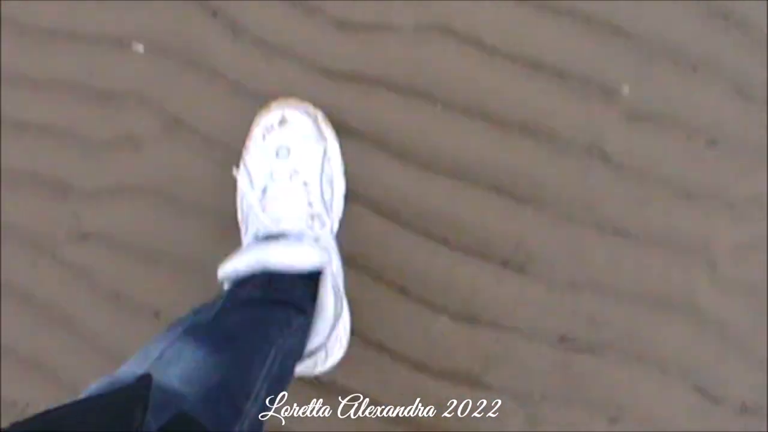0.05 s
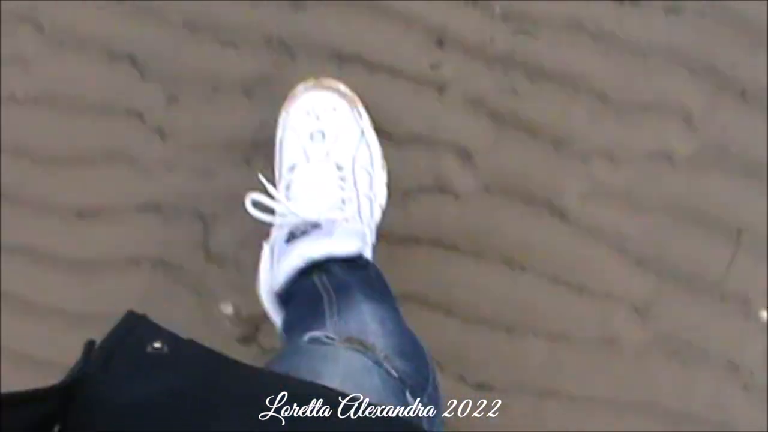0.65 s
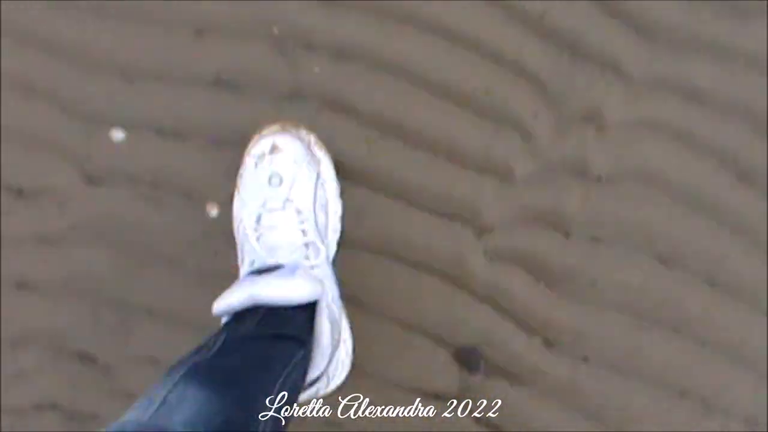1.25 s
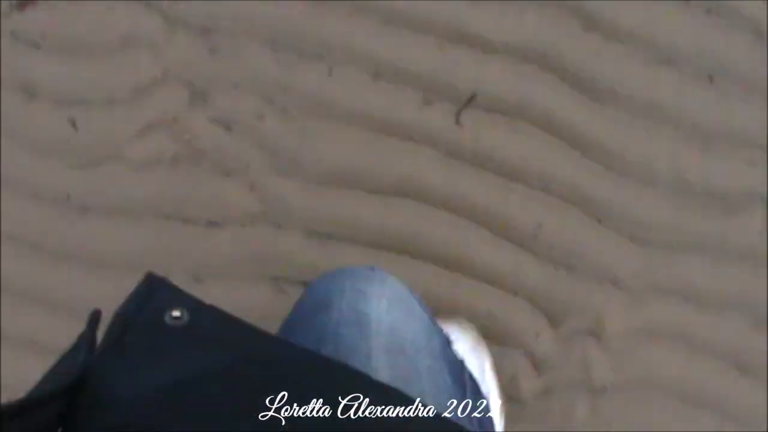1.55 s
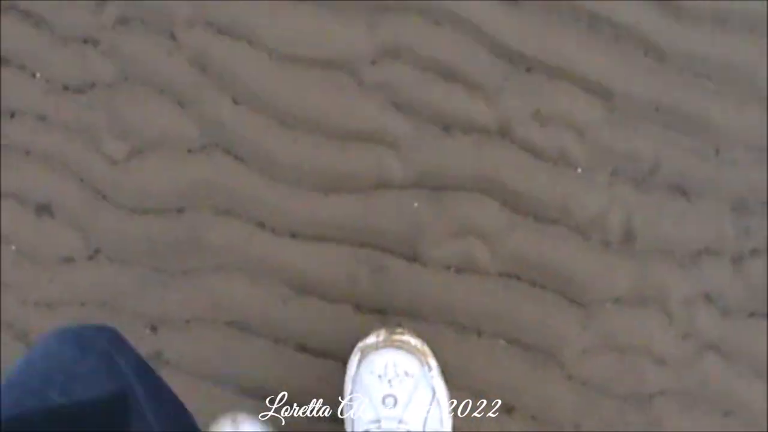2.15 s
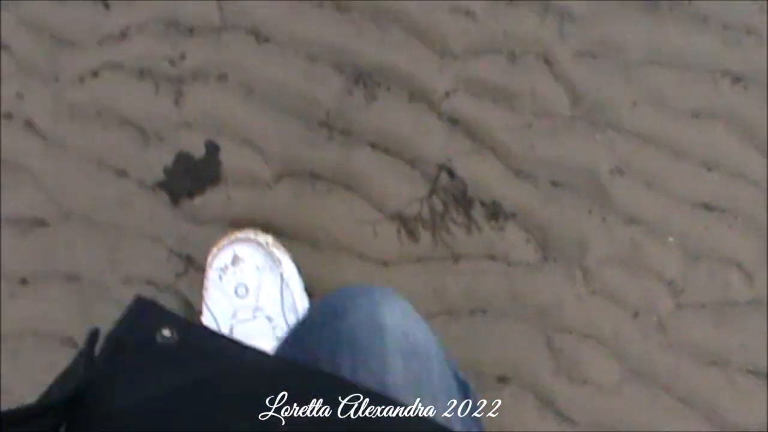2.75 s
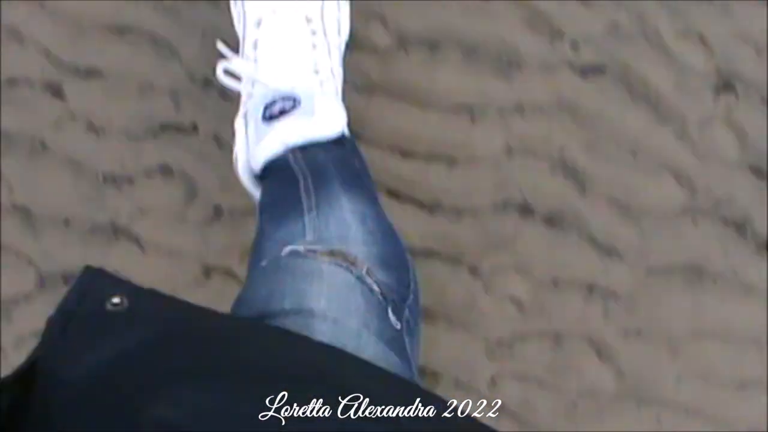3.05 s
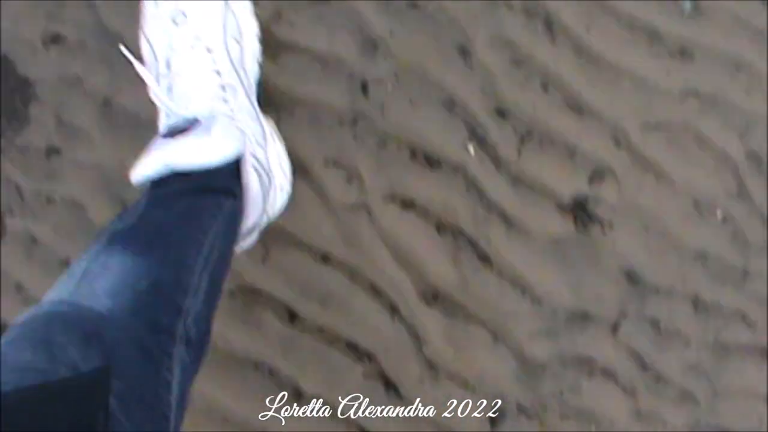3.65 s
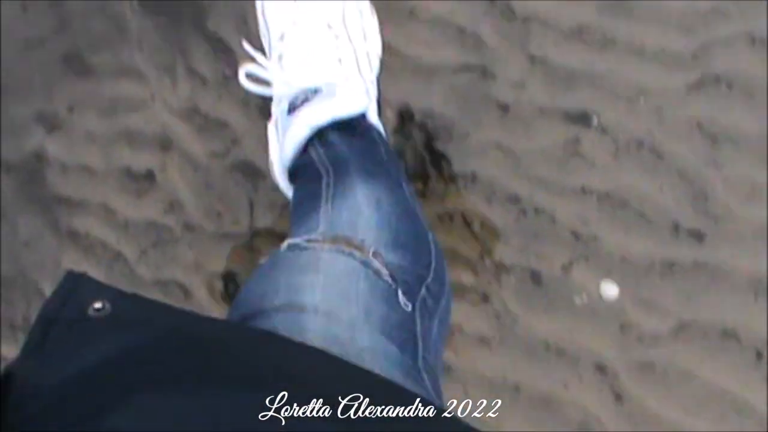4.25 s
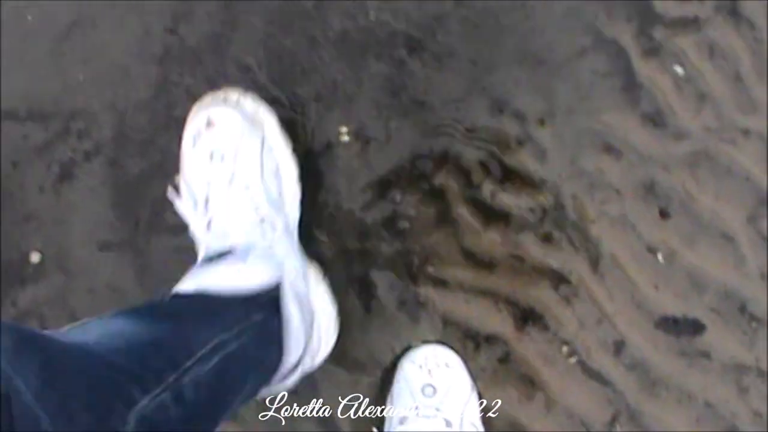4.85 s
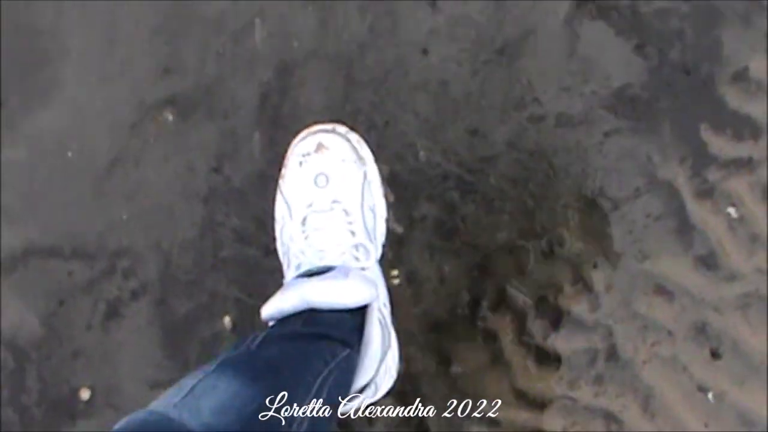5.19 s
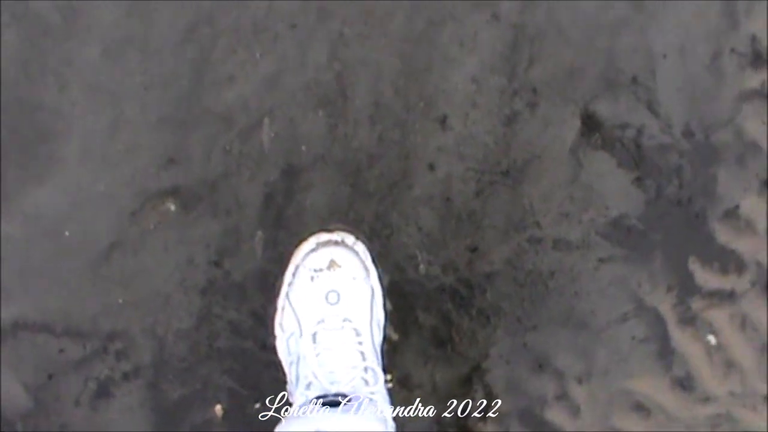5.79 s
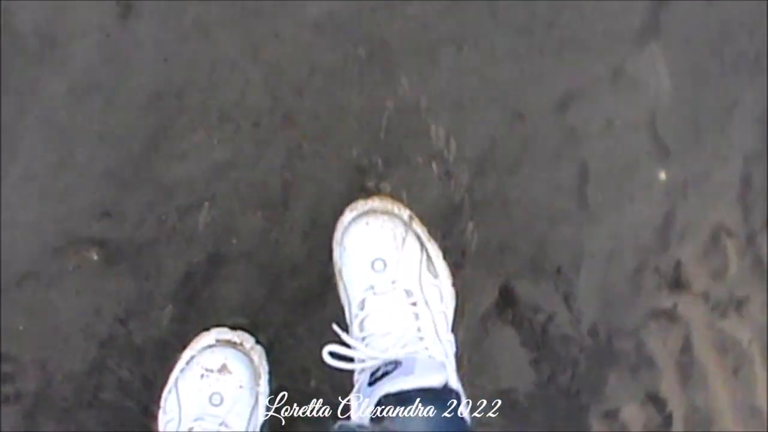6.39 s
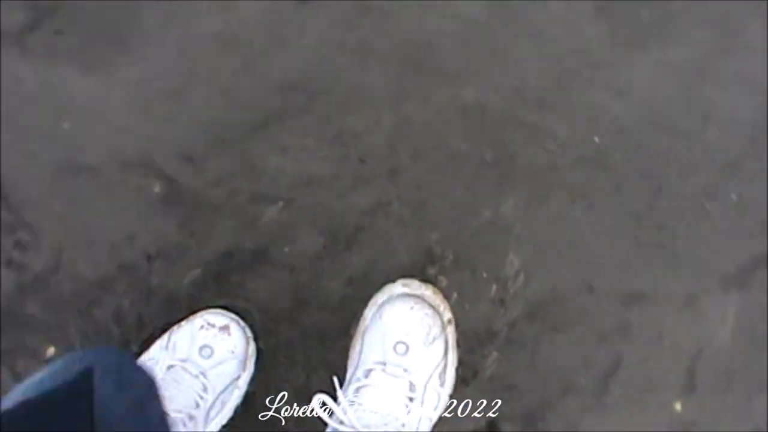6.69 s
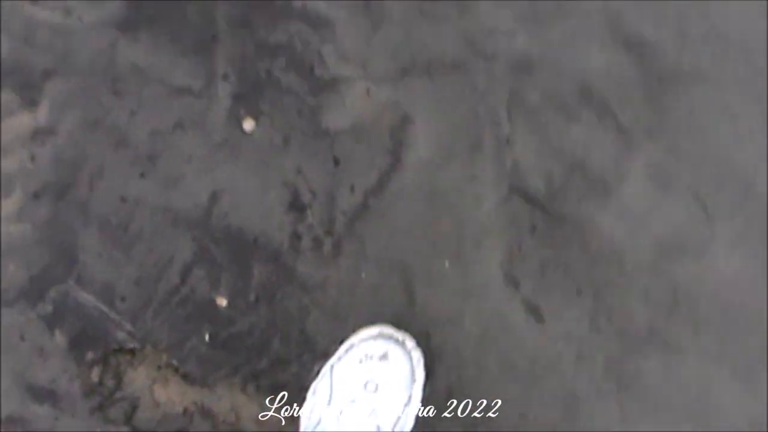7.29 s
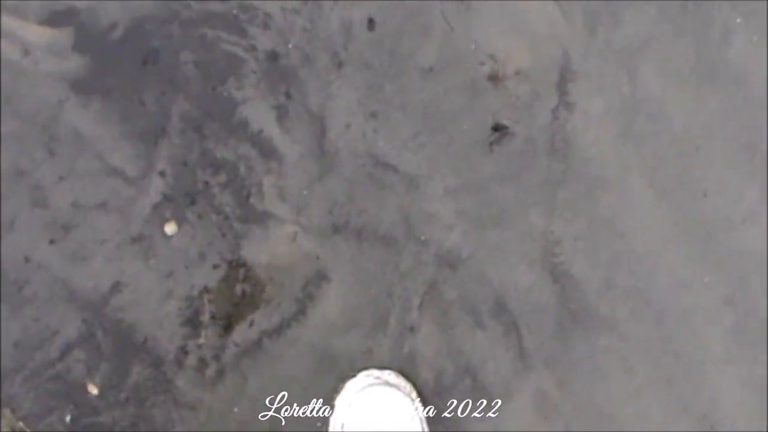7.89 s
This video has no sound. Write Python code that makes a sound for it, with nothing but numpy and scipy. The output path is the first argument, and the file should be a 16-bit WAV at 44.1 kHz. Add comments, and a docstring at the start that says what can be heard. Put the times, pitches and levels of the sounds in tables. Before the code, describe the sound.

Soft footsteps squelch over wet sand and mud, with jeans swishing and wind buffeting the microphone.

```python
"""A windy walk over wet sand

Someone carries a camera over rippled wet sand onto mud. Jeans and soles swish with each stride,
water squelches out under the shoes, and small bubbles ring as they pop. Gusts of swirling air
buffet the microphone openings. Towards the end a far roar, probably surf, swells and is
mirrored by the flat wet ground."""
import sys
import numpy as np
from scipy import signal
from scipy.fft import rfft, irfft, next_fast_len
from scipy.io import wavfile
from scipy.ndimage import uniform_filter1d, minimum_filter1d, map_coordinates

SR = 44100
rng = np.random.default_rng(int(sys.argv[2]) if len(sys.argv) > 2 else 0)


def store_wav(level_fs):
    """Save 16-bit WAV to argv[1]."""
    pcm = np.round(np.clip(np.atleast_2d(level_fs), -1, 1) * 32767)
    wavfile.write(sys.argv[1], SR, pcm.T.astype(np.int16))


N = 358533

# Levels in the tables are relative: the functions set the final loudness.
# Footfalls. Each row: landing time and heel-to-toe roll in seconds, cloth and scuff levels in dB.
FOOTFALLS = [(0.0, 0.16, -41, -44.5), (0.634, 0.11, -41.5, -41), (1.05, .25, -45, -49),
             (1.86, 0.17, -45, -52.5), (2.43, 0.21, -46.5, -47.5), (3.119, 0.21, -42.5, -46.5),
             (3.71, 0.2, -41, -47.5), (4.24, 0.13, -39, -44), (4.951, 0.18, -50, -52),
             (6.19, 0.069, -49.5, -49.5), (6.572, 0.037, -47, -46.5), (7.25, 0.14, -48.5, -50)]
# Denim brushing denim as a leg swings. Each row: peak time in seconds, level in dB, length in seconds.
LEG_SWISHES = [(0.08, -37, 0.018), (0.183, -39, 0.037), (0.304, -39, 0.051), (0.528, -43, 0.11),
               (0.659, -32.5, 0.031), (0.805, -40.5, 0.067), (1.209, -36, 0.022), (1.31, -44, .025),
               (1.4, -48, 0.015), (1.504, -40.5, 0.039), (1.613, -48, 0.015), (1.726, -46.5, 0.026),
               (1.782, -43.5, 0.025), (1.876, -36.5, 0.053), (2.06, -42, 0.032), (2.22, -43.5, 0.12),
               (2.445, -40, 0.035), (2.778, -48, 0.043), (3.01, -47.5, 0.053), (3.145, -37.5, 0.036),
               (3.55, -44.5, 0.11), (3.705, -35.5, 0.023), (3.804, -39.5, .05), (4.003, -44, 0.06),
               (4.3, -34, 0.055), (7.058, -39.5, 0.024), (7.3, -42, 0.03), (7.84, -46.5, 0.036)]
# Clothes and soles never quite rest. Each row: time in seconds, cloth and scuff levels in dB.
RESTING_RUSTLE = [(0, -52.5, -55), (1.1, -45, -48), (1.65, -54, -57), (2.3, -48.5, -51),
                  (2.9, -55.5, -55.5), (4.1, -47, -50), (4.6, -53, -53), (5.55, -59, -60.5),
                  (6.4, -53, -55), (7.15, -47, -52), (7.55, -52, -47), (8.13, -53, -50)]
# Water pressed from under a sole. Each row: middle time and half length in seconds,
# pitch of the large bubbles in Hz, then levels of the large, medium and fine bubbles in dB.
SQUEEZES = [(0.042, 0.03, 1390, -59, -40, -55), (0.091, 0.0081, 1310, -38, -37, -37),
            (.745, 0.021, 1280, -39.5, -55, -55), (1.209, 0.0097, 2400, -47, -42, -48),
            (1.242, .009, 2900, -43, -42, -50), (1.334, 0.017, 1320, -41.5, -41.5, -50),
            (1.935, .03, 1440, -42, -47, -58), (3.747, .003, 2400, -50, -32.5, -42),
            (3.826, 0.018, 1500, -37, -40.5, -50), (3.884, 0.034, 2590, -40, -38, -52),
            (4.307, 0.0062, 1490, -36, -36, -24), (4.347, 0.0092, 1780, -25, -32, -28.5),
            (4.38, .012, 2400, -42, -52, -54), (4.43, .01, 1390, -41.5, -42.5, -40),
            (5.036, 0.0066, 2190, -43, -41, -36), (5.05, .0028, 1680, -26, -23, -18.5),
            (5.077, .007, 1650, -37, -40, -38), (6.219, 0.0058, 1880, -47, -43, -44),
            (6.247, 0.0062, 1720, -45, -39, -40.5), (7.886, 0.0063, 1700, -44, -36.5, -33.5)]
# Single bubbles bursting. Each row: time in seconds, ring level in dB, pitch in Hz, spray level in dB.
BUBBLE_POPS = [(1.0425, -19, 12300, -47), (1.605, -20, 10200, -46), (3.6903, -20, 10500, -31),
               (3.883, -13, 2500, -23), (3.8993, -19, 3280, -30), (3.9188, -17, 3620, -28),
               (3.9453, -30, 3000, -32), (3.9746, -15, 9470, -25), (4.079, -10, 8500, -22.5),
               (4.2972, -20.5, 1480, -20), (4.3222, -18, 3400, -31), (4.3345, -13, 8060, -15),
               (4.343, -17, 3040, -16.5), (4.392, -18, 2440, -44), (4.4301, -33, 3200, -28.5),
               (4.47, -30, 2330, -34), (4.605, -31, 3100, -53), (5.023, -33, 9000, -34),
               (5.0444, -11, 9000, -17.5), (5.0475, -14, 2160, -33), (5.051, -8, 4430, -26),
               (5.0517, -14.5, 1210, -36), (5.0617, -14, 5900, -30), (5.066, -18, 1770, -29),
               (5.0727, -14.5, 3870, -36), (5.0825, -16, 1510, -24.5), (5.102, -23, 1630, -44),
               (5.2775, -34, 1810, -46), (5.885, -29.5, 3230, -39), (5.902, -24, 990, -36),
               (5.9126, -35, 2880, -37), (5.939, -25.5, 7850, -41), (6.0827, -22, 11600, -38),
               (6.2495, -27, 3800, -28.5), (6.276, -25.5, 3900, -37), (6.768, -24.5, 4940, -46),
               (6.918, -20, 12400, -43)]
# The wind's slow course. Each row: time in seconds, then deep push, buffet and flutter levels in dB.
WIND_LEVELS = [(0, -33, -25, -37), (0.5, -35, -34.5, -44), (0.85, -27.5, -21, -33), (1.25, -34, -24, -33.5),
               (1.65, -38, -36.5, -50), (1.95, -36, -23.5, -30.5), (2.3, -35, -23.5, -34),
               (2.58, -34, -21.5, -22.5), (2.78, -33.5, -25, -28.5), (3.3, -33.5, -22, -26),
               (3.95, -33, -20, -29.5), (4.7, -41, -35.5, -45.5), (5.48, -46, -41, -55),
               (5.85, -40, -31, -48), (6.2, -39.5, -43, -64), (7.17, -53.5, -57, -54),
               (7.3, -33, -30.5, -39), (8.13, -26, -19.5, -40.5)]
# Gusts and lulls. Each row: peak time in seconds, buffet and flutter changes in dB, half length in seconds.
GUSTS_AND_LULLS = [(0.157, 13, 10, 0.039), (.52, -5, 1, .04), (0.594, 7.5, 8, 0.014),
                   (1.677, -1.5, -7, .025), (2.115, 2, 1.5, 0.032), (2.259, -6, -6, 0.056),
                   (2.48, 9, 5.5, 0.059), (2.62, -1, 2.5, .06), (3.526, -5, -5, 0.046),
                   (3.733, 5, -0.5, 0.08), (4.302, 4, 2.5, .03), (4.386, -11, -3.5, 0.046),
                   (5.002, 7.5, -2, .03), (5.725, 9.5, 13, 0.068), (5.964, 6, 7, 0.056),
                   (6.494, 11, 1, 0.13), (7.477, 2.5, 1.5, 0.052), (7.646, -10, -2, 0.08),
                   (7.796, 6.5, 12, 0.13)]
# Eddies, small swirls of air that snap. Each row: time in seconds, level in dB, pitch in Hz.
EDDY_SNAPS = [(.588, -17, 345), (.815, -19, 834), (1.392, -18.5, 447), (1.713, -18.5, 298),
              (2.546, -10.5, 800), (2.56, -14, 1330), (2.608, -13, 1570), (2.628, -17, 1500),
              (2.646, -15, 1470), (2.678, -18, 1480), (2.754, -17.5, 850), (2.8708, -14, 1260),
              (3.083, -19, 905), (3.183, -12.5, 950), (3.259, -20, 750), (3.369, -19, 880),
              (3.414, -22, 750), (4.032, -17.5, 840)]
# Which way the air crosses. Each row: time in seconds, direction (+1 left to right, -1 right to left).
WIND_DIRECTION = [(0, 1), (3.7, 0.89), (5.5, 0.56), (5.9, -0.84), (8.13, -1)]
# Eddies reach the upwind opening first. Each row: frequency in Hz, head start (phase) in radians.
UPWIND_LEAD = [(20, .1), (70, 0.15), (160, 0.93), (340, 1.63), (860, 2.04)]
# The far roar. Each row: time in seconds, level in dB, echo delay in milliseconds, echo strength (0 to 1).
SURF_COURSE = [(0, -45.5, 2, 0), (4.6, -50.5, 1.7, 0.13), (5.5, -47.5, 1.63, 0.16), (6.1, -45, 1.32, 0.1),
               (6.5, -41, 0.42, 0.07), (6.75, -36, 0.68, 0.08), (7.05, -35.5, 0.81, 0.2),
               (7.3, -37.5, 1.12, 0.33), (7.6, -38.5, 1.24, 0.3), (7.85, -38.5, 1.3, 0.1),
               (8.13, -41.5, 1.27, 0.3)]
# A hollow tone grows as the roar spreads. Each row: time in seconds, level in dB compared with the roar.
HOLLOW_GROWTH = [(6.9, -29), (7.3, -31), (7.6, -11), (7.9, -3)]

# The tone colour of each noise. Each row: frequency in Hz, strength there in dB.
CLOTH_COLOUR = [(600, -15), (1500, -14.5), (3000, -10), (5500, -4), (8000, -0.5), (10000, 1.5),
                (12000, -1.5), (14000, -8.5), (16000, -14)]
SCUFF_COLOUR = [(300, -4.5), (700, 2.5), (1000, -0.5), (1370, 3.5), (2100, 0.5), (3200, 0.5), (4400, -2),
                (7000, -13), (12000, -28)]
SPRAY_COLOUR = [(500, -38), (1400, 3), (4000, -1), (6500, -6), (10000, 2.5), (13000, -2), (16000, -2.5)]
PUSH_COLOUR = [(15, -20), (28, -10.5), (52, 2.5), (80, 2), (120, -5.5), (250, -34), (600, -80)]
BUFFET_COLOUR = [(30, -40), (60, -12.5), (90, -1), (150, 1), (230, -4), (330, -18.5), (600, -36),
                 (1500, -82)]
FLUTTER_COLOUR = [(100, -31), (200, -3), (290, -0.5), (420, -7.5), (650, -16), (1000, -24), (1800, -49.5),
                  (4000, -55)]
CRACKLE_COLOUR = [(300, -29), (800, 9), (1500, -2), (2300, -17), (5000, -40)]
ROAR_COLOUR = [(25, -4), (60, -3), (150, 0), (400, 3), (850, 2), (1200, -3.5), (1650, -6), (2300, -11),
               (4400, -19.5), (7000, -21.5), (15000, -35)]
HOLLOW_COLOUR = [(900, -23), (1350, 9), (1700, 14), (2050, -2), (2450, 3), (2750, -4), (3100, 1),
                 (3500, -17), (4400, -8), (5200, -14), (6000, -6), (7500, -9), (15000, -22)]
HISS_COLOUR = [(2000, -5), (10000, -13), (16000, 6)]
# How alike left and right sound. Each row: frequency in Hz, likeness (1 the same, 0 unrelated).
WIND_LIKENESS = [(60, 0.84), (300, 0.66), (640, 1), (1400, 0.88)]
NEAR_LIKENESS = [(1000, 1), (4000, 0.9), (12000, 0.79)]
ROAR_LIKENESS = [(150, 1), (700, 0.84), (1400, 0.74), (3100, 0.17)]

TOP_HZ = 15850  # the highest frequency the camera lets through


def strides():
    """Cloth brushes past cloth while the sole scuffs over the sand and single grains tick against it."""
    cloth_level, scuff_level = rubbing_levels()
    cloth = unit(amp(0.96 * wobble(350)) * patchy(noise(CLOTH_COLOUR, NEAR_LIKENESS), depth_db=1.5))
    scuff = unit(amp(0.37 * wobble(220)) * patchy(noise(SCUFF_COLOUR, NEAR_LIKENESS), depth_db=2.0))
    grains = (rng.random(N) < 250 / SR) * rng.standard_normal(N)  # about 250 a second
    grit = unit(filtered(grains, lambda hz: amp(along(CLOTH_COLOUR, hz))))
    return cloth_level * (amp(1.23) * cloth + amp(-12) * grit) + amp(2.6) * scuff_level * scuff


def rubbing_levels():
    """How hard cloth and soles rub: footfalls, leg swings and the rustle between them add their power."""
    cloth, scuff = (amp(db) ** 2 for db in curves(RESTING_RUSTLE))
    for landing, roll, cloth_db, scuff_db in FOOTFALLS:
        contact = swell(landing, rise_s=0.025, hold_s=roll, fall_s=0.033)
        cloth += (amp(cloth_db) * contact) ** 2
        scuff += (amp(scuff_db) * contact) ** 2
    swish = sum((amp(db) * swell(peak, 0.78 * length, 0, 1.26 * length)) ** 2
                for peak, db, length in LEG_SWISHES)
    dull_rub = amp(-6.5) ** 2 * swish
    return np.sqrt(cloth + swish), np.sqrt(scuff + dull_rub)


def patchy(sound, depth_db):
    """Random patches of time and pitch get louder or softer, mottling the rustle."""
    spectra = signal.stft(sound, nperseg=512)[2]
    patches = uniform_filter1d(rng.standard_normal(spectra.shape[1:]), size=7, axis=0)
    patches = uniform_filter1d(patches, size=12, axis=1)
    return signal.istft(spectra * amp(depth_db * unit(patches)), nperseg=512)[1][:, :N]


def squelches(medium_hz=4340, fine_hz=10100):
    """Each squeeze frees swarms of large, medium and fine bubbles; a longer squeeze frees more."""
    out, lead_s = np.zeros((2, N)), 1 / 8
    for middle, half_s, large_hz, large_db, medium_db, fine_db in SQUEEZES:
        swarms = [(large_db, large_hz, 0.27), (medium_db, medium_hz, 0.34), (fine_db, fine_hz, 0.33)]
        for db, hz, spread_octaves in swarms:
            swarm = np.zeros((2, SR // 2))
            draws = rng.standard_normal((120, 4))[:int(12 + 2200 * half_s)]
            for place, (late, pitch, size, pan) in zip(np.linspace(-1.7, 1.7, len(draws)), draws):
                ring = bubble(min(hz * 2 ** (spread_octaves * pitch), TOP_HZ), cycles=22, rise=0.05)
                # bubbles start abruptly and thin out slowly
                start = lead_s + (place + 0.2 * place ** 2 + 0.08 * late) * half_s
                strength = amp(2.1 * size) * np.exp(-place ** 2 / 2)
                add(swarm, start, strength * lean_left(1.8 * pan) * ring)
            # the energy of the squeeze is spread over its length
            gain = amp(db) * np.sqrt(4 * half_s * SR / np.sum(swarm ** 2))
            add(out, middle - lead_s, gain * swarm)
    return out


def pops():
    """A bursting bubble rings briefly and throws a tick of spray."""
    rings, spray_level = np.zeros((2, N)), np.zeros(N)
    t = np.arange(SR // 50) / SR
    fade_db = -60 * t / 0.0078
    for (start, db, hz, spray_db), pan in zip(BUBBLE_POPS, rng.standard_normal(len(BUBBLE_POPS))):
        add(rings, start, amp(db + 1) * lean_left(1.2 * pan) * bubble(hz, cycles=17, rise=0.06))
        add(spray_level, start, amp(spray_db + 4.5 + fade_db))
    return rings + spray_level * noise(SPRAY_COLOUR, NEAR_LIKENESS)


def seepage(mean_wait_s=0.16, centre_hz=4150, spread_octaves=0.76):
    """Water seeps back into each footprint and five faint bubbles burst at random."""
    out = np.zeros(N)
    for landing, roll, _, scuff_db in FOOTFALLS:
        for wait, (pitch, size) in zip(rng.exponential(size=5), rng.standard_normal((5, 2))):
            ring = bubble(min(centre_hz * 2 ** (spread_octaves * pitch), TOP_HZ), cycles=13, rise=0.06)
            add(out, landing + roll / 2 + mean_wait_s * wait, amp(scuff_db + 11.5 + size) * ring)
    return out


def bubble(hz, cycles, rise):
    """A pocket of air rings, fading 60 dB over the given cycles, its pitch rising as it opens."""
    turns = hz * np.arange(SR // 40) / SR
    age = turns / cycles
    opening = 1 - np.exp(-(2 * turns) ** 2)
    tone = np.sin(2 * np.pi * turns * (1 + rise * np.minimum(age, 1)))
    return tone * amp(-60 * age) * opening


def wind():
    """Faster air makes smaller eddies: a deep push gives way to buffets, flutter and then crackle."""
    push_db, buffet_db, flutter_db = curves(WIND_LEVELS)
    for peak, buffet_change_db, flutter_change_db, half_s in GUSTS_AND_LULLS:
        gust = swell(peak, half_s, 0, half_s)
        push_db += 0.46 * buffet_change_db * gust
        buffet_db += buffet_change_db * gust
        flutter_db += flutter_change_db * gust
    # the air breaks up into crackle, at full strength once flutter_db reaches -22.5
    crackle_db = -36 + 2.5 * np.minimum(flutter_db + 22.5, 0)
    lumps = wobble(28)
    push = noise(PUSH_COLOUR, WIND_LIKENESS)
    buffet = unit(amp(1.5 * lumps) * noise(BUFFET_COLOUR, WIND_LIKENESS))
    flutter = unit(amp(1.33 * lumps + 3.2 * wobble(140)) * noise(FLUTTER_COLOUR, WIND_LIKENESS))
    crackle = unit(amp(3.5 * wobble(260)) * noise(CRACKLE_COLOUR, WIND_LIKENESS))
    return (amp(push_db + 0.5) * push + amp(buffet_db - 0.83) * buffet
            + amp(flutter_db + 3) * flutter + amp(crackle_db) * crackle)


def eddies():
    """Single eddies snap at the microphone openings, each a short ring shaped like a bubble's."""
    out = np.zeros((2, N))
    for (start, db, hz), pan in zip(EDDY_SNAPS, rng.standard_normal(len(EDDY_SNAPS))):
        add(out, start, amp(db + 6) * lean_left(2 * pan) * bubble(hz, cycles=6.5, rise=0.033))
    return out


def across_openings(air):
    """The same eddies pass one microphone opening and then the other."""
    direction, = curves(WIND_DIRECTION)
    common = filtered(air, lambda hz: np.cos(along(UPWIND_LEAD, hz) / 2))
    lead = filtered(air, lambda hz: 1j * np.sin(along(UPWIND_LEAD, hz) / 2))
    return common + np.array([[1], [-1]]) * direction * lead


def surf():
    """A far roar arrives direct and off the wet ground; the changing delay sweeps hollows through it."""
    level_db, delay_ms, echo_strength = curves(SURF_COURSE)
    hollow_db, = curves(HOLLOW_GROWTH)
    roar = noise(ROAR_COLOUR, ROAR_LIKENESS) + amp(hollow_db) * noise(HOLLOW_COLOUR, ROAR_LIKENESS)
    now = np.arange(N)
    earlier = now - delay_ms * SR / 1000
    echo = np.array([np.interp(earlier, now, side) for side in roar])
    return amp(level_db + 1.1 * wobble(6)) * lean_left(1.5) * (roar + echo_strength * echo)


def electronics(hiss_db=-64, whine_db=-68, whine_hz=15625):
    """The camera's own faint hiss and thin whine."""
    whine = np.sqrt(2) * np.sin(2 * np.pi * whine_hz * np.arange(N) / SR)
    return amp(hiss_db) * noise(HISS_COLOUR, NEAR_LIKENESS) + amp(whine_db) * whine


def amp(db):
    """Turn decibels into a number to multiply by."""
    return 10 ** (np.asarray(db) / 20)


def lean_left(db):
    """Gains that turn the left side up by db and the right side down as much."""
    return amp([[db], [-db]])


def unit(sound):
    """Scale a sound to an average power of 1."""
    return sound / np.sqrt(np.mean(sound ** 2) + 1e-20)


def along(table, hz):
    """Read between the rows of a frequency table, on a scale of octaves."""
    row_hz, values = np.transpose(table)
    return np.interp(np.log(hz + 1), np.log(row_hz + 1), values)


def curves(table):
    """One value per sample for each column after the time."""
    times, *columns = np.transpose(table)
    return [np.interp(np.arange(N) / SR, times, column) for column in columns]


def swell(peak_s, rise_s, hold_s, fall_s):
    """A level that rises smoothly to 1, holds and falls."""
    t = np.arange(N) / SR - peak_s
    outside = np.minimum(t, 0) / rise_s + np.maximum(t - hold_s, 0) / fall_s
    return np.exp(-np.minimum(outside ** 2, 20))


def wobble(rate):
    """A smooth curve through rate random points a second."""
    return map_coordinates(rng.standard_normal(int(N * rate / SR) + 4), [np.arange(N) * rate / SR])


def filtered(sound, response):
    """Multiply each frequency in a sound by response(hz)."""
    size = next_fast_len(N + SR // 4)
    return irfft(rfft(sound, size) * response(np.fft.rfftfreq(size, 1 / SR)), size)[..., :N]


def noise(colour, likeness):
    """Stereo noise of power 1 with a given tone colour and left-right likeness."""
    def response(hz):
        width = np.arccos(np.clip(along(likeness, hz), -1, 1)) / 2
        return amp(along(colour, hz)) * [np.cos(width), np.sin(width)]
    mid, side = filtered(rng.standard_normal((2, N)), response)
    return unit(np.array([mid + side, mid - side]))


def add(track, start_s, sound):
    """Mix a short sound into a track."""
    where = round(start_s * SR) + np.arange(sound.shape[-1])
    inside = (where >= 0) & (where < track.shape[-1])
    track[..., where[inside]] += sound[..., inside]


def scene():
    """Feet below the camera, wind on it, surf far off."""
    # the water sounds have no bass, and the microphone dulls their highest treble
    water_band = signal.butter(N=3, Wn=[950, 13000], btype="bandpass", fs=SR, output="sos")
    water = amp(-0.5) * signal.sosfilt(water_band, squelches() + pops() + seepage())
    air = across_openings(wind() + eddies())
    return (strides() + water) * lean_left(0.3) + air * lean_left(-0.25) + surf()


def record(dry, ceiling_db=-6.5):
    """The camera turns down the loudest peaks, adds its own noise and cuts the highest treble."""
    needed = np.minimum(1, amp(ceiling_db) / (np.abs(dry).max(axis=0) + 1e-9))
    gain = uniform_filter1d(minimum_filter1d(needed, size=441), size=441)  # smoothed over 10 ms
    return filtered(dry * gain + electronics(), lambda hz: hz < TOP_HZ)


dry = scene()
out = record(dry)
store_wav(out)
```